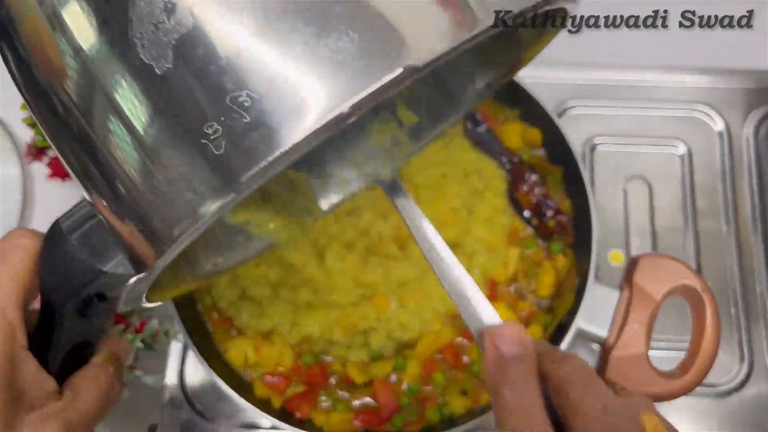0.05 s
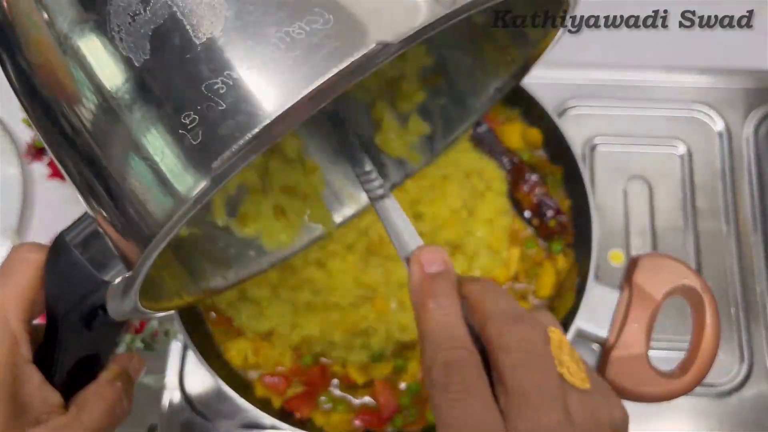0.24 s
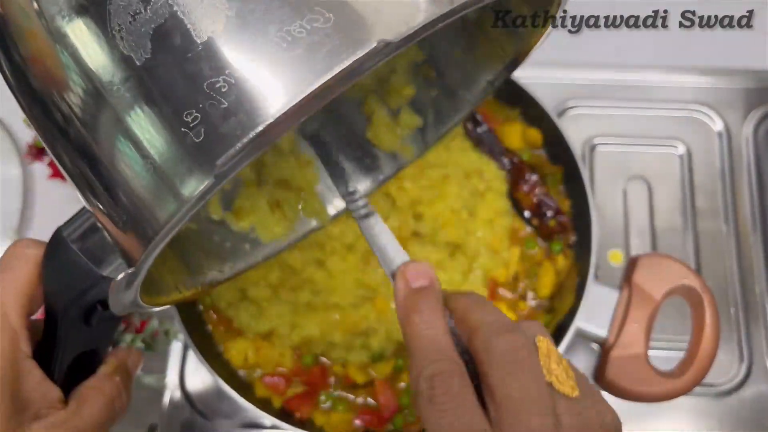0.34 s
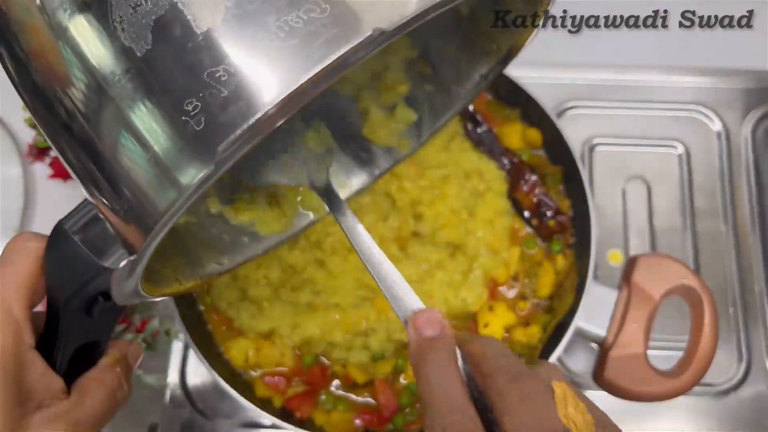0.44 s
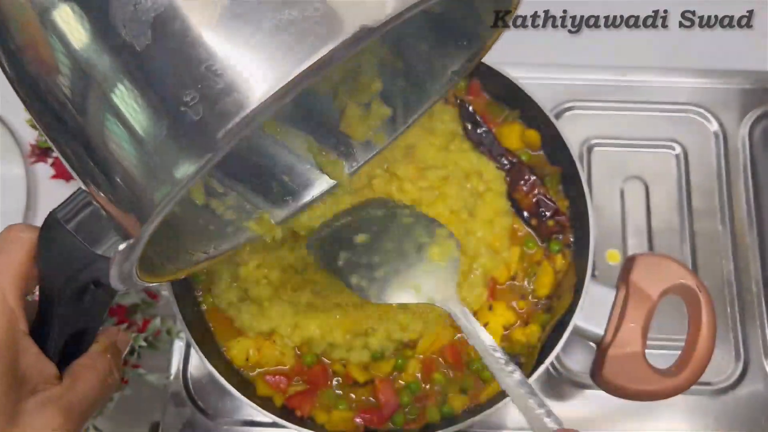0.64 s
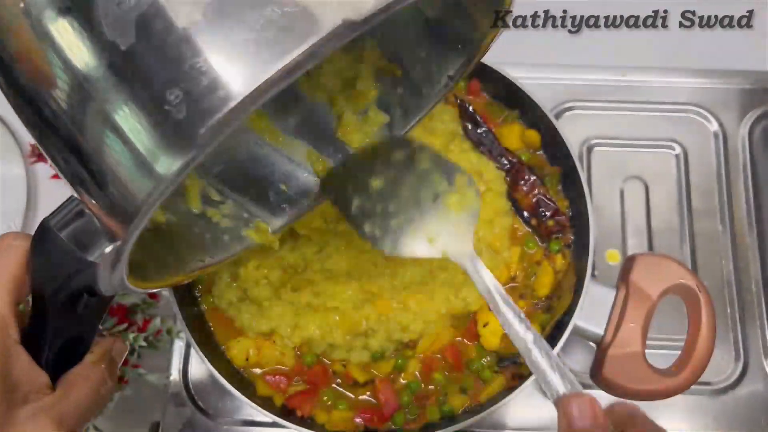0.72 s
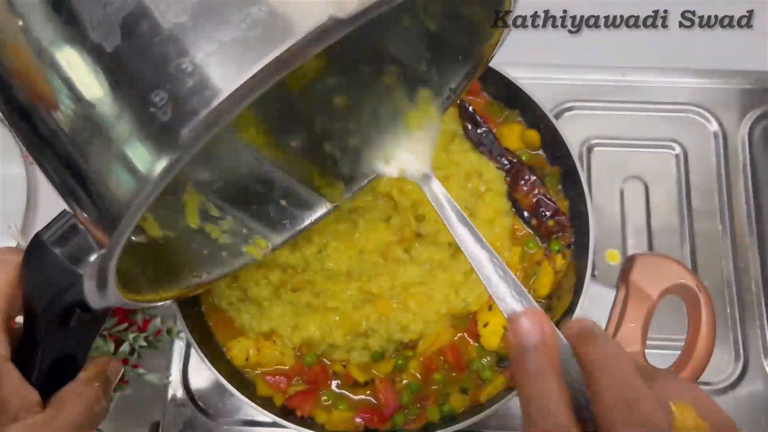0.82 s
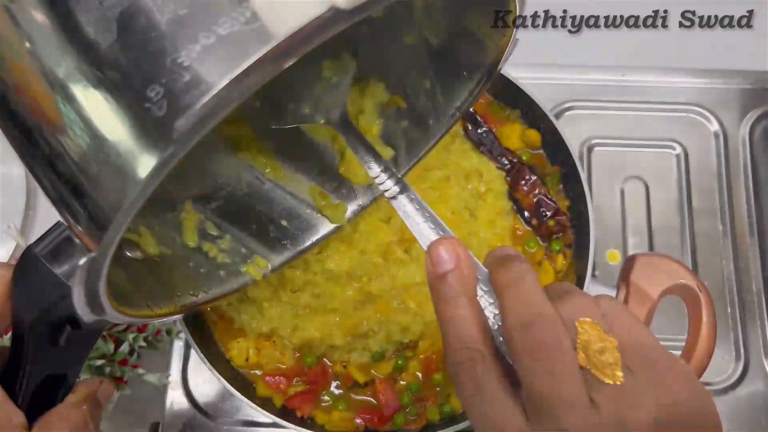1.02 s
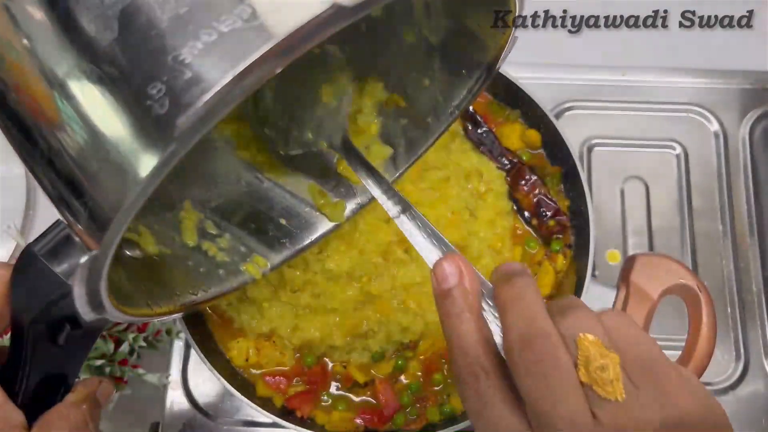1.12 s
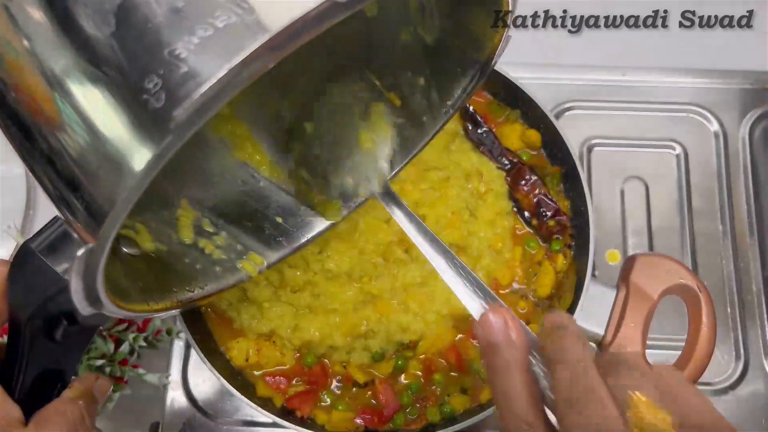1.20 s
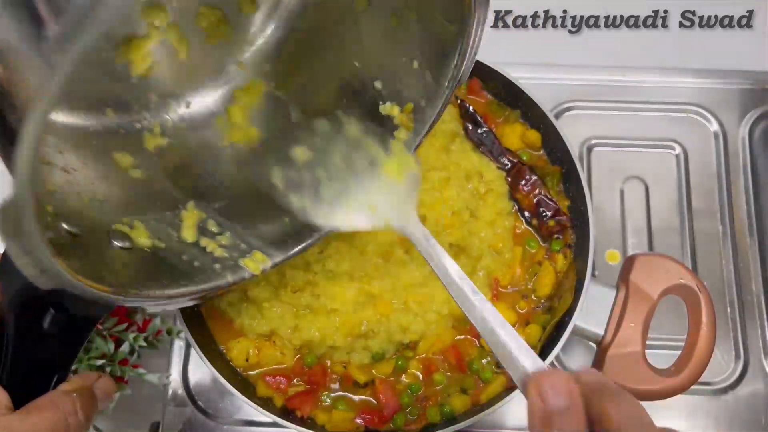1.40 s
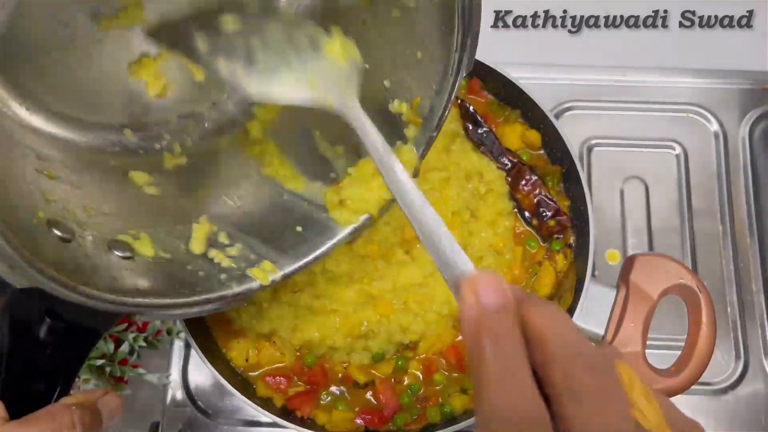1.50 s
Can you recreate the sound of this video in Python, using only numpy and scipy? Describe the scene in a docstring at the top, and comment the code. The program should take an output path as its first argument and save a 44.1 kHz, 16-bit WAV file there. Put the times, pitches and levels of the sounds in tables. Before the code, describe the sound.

Metal ladle clanking and scraping in a thin steel pot, with faint wet food ticks.

```python
"""Ladle in a steel pot

A small kitchen with a low hum; one microphone, close to a tilted stainless pot.
A steel ladle knocks inside it and twice scrapes along the wall, pushing out thick food that ticks wetly.
Each knock cracks through the thin shell and rings pot and ladle; each scrape is a stream of tiny
catches in the same metal."""
import sys
import numpy as np
from scipy import signal
from scipy.fft import rfft, irfft
from scipy.io import wavfile

SR = 44100
rng = np.random.default_rng(int(sys.argv[2]) if len(sys.argv) > 2 else 0)


def generate_wav(sig):
    """Save sig (samples, or channels by samples) to the path in sys.argv[1] as 16-bit PCM at SR."""
    pcm = np.round(np.clip(np.atleast_2d(sig).T, -1, 1) * 32767).astype(np.int16)
    wavfile.write(sys.argv[1], SR, pcm)


N = 68355
T = np.arange(N) / SR
TOP_HZ = 15800


def undb(db):
    """Decibels to amplitude."""
    return 10 ** (np.asarray(db) / 20)


def unit(x):
    """Scale to rms 1."""
    return x / np.sqrt(np.mean(x ** 2) + 1e-18)


def fade(t60):
    """Exponential decay, 60 dB down after t60 seconds."""
    return np.exp(-np.log(1000) * T / max(t60, 1e-3))


def swell(t60, rise_s):
    """Envelope of a ring that builds up before it fades; peak 1."""
    shape = fade(t60) * (1 - np.exp(-T / max(rise_s, 1e-4))) ** 2
    return shape / shape.max()


def delay(x, s):
    """Start a sound s seconds later."""
    return np.concatenate([np.zeros(int(s * SR)), x])[:N]


def through(x, response):
    """Play x through a response of unit energy."""
    return signal.fftconvolve(x, unit(response))[:N] / np.sqrt(N)


def colour(x, points):
    """Shape by a spectrum of (f/Hz, level/dB) points, rolling off below the first; rms 1."""
    hz, db = np.array(points).T
    f = np.maximum(np.arange(N // 2 + 1) * SR / N, 1)
    gain = undb(np.interp(np.log(f), np.log(hz), db))
    low_cut = np.minimum(f / hz[0], 1) ** 2
    return unit(irfft(rfft(x) * gain * low_cut, N))


def band(x, lo_hz, hi_hz):
    """Band-pass; rms 1."""
    sos = signal.butter(3, [lo_hz, min(hi_hz, SR / 2 - 1000)], "band", fs=SR, output="sos")
    return unit(signal.sosfilt(sos, x))


def sine(hz):
    """A partial at a random phase."""
    return np.sin(2 * np.pi * (hz * T + rng.random()))


def wavering(hz, depth, spread_hz):
    """A partial made unsteady by a narrow band of noise around it."""
    return sine(hz) + depth * band(rng.standard_normal(N), hz - spread_hz, hz + spread_hz)


def impacts(per_s, spread_db):
    """Random tiny impacts of uneven size; rms 1."""
    size = undb(spread_db * np.minimum(rng.exponential(size=N), 4))
    struck = rng.random(N) < per_s / SR
    return unit(struck * size * rng.choice([-1, 1], N))


def kitchen():
    """Room tone: steady noise with a low, wavering hum."""
    # spectrum of the room tone: f/Hz, relative density/dB
    room_spectrum = [(30, -41), (50, -7), (90, -2.5), (150, -4.5), (210, -17.5), (295, -4.5), (350, -12),
                     (500, -6.5), (700, -17), (1000, -19.5), (1400, -17), (5000, -26.5), (15500, -30.5)]
    # partials of the hum: f/Hz, level/dB
    hum_partials = [(78, -59), (121, -58.5)]
    hum = sum(undb(db) * unit(wavering(hz, depth=0.55, spread_hz=10)) for hz, db in hum_partials)
    return hum + undb(-53.5) * colour(rng.standard_normal(N), room_spectrum)


def food():
    """Sticky food slides, parts and lands: a soft rustle and a few clear ticks over a faint patter."""
    # the louder wet ticks: t/s, level/dB
    wet_ticks = [(.771, -48), (.8545, -47), (0.8983, -43.5), (0.929, -43.5), (1.397, -44.5), (1.414, -48),
                 (1.49, -62.5), (1.543, -46)]
    # spectrum of ticks and patter: f/Hz, relative density/dB
    wet_spectrum = [(600, -4), (2000, -6.5), (5000, -6), (10000, -5.5), (16000, -14)]
    # rustle of the food sliding out: t/s, level/dB
    slide_levels = [(.68, -60.5), (.82, -56.5), (.95, -58.5), (1.08, -61.5)]
    tick_t60 = 0.025
    ticks = sum(delay(undb(db) * colour(rng.standard_normal(N), wet_spectrum) * fade(tick_t60), s)
                for s, db in wet_ticks)
    patter = through(impacts(per_s=90, spread_db=3), rng.standard_normal(N) * fade(tick_t60 / 2))
    slide_gain = undb(np.interp(T, *np.array(slide_levels).T))
    slide = slide_gain * band(rng.standard_normal(N), lo_hz=666, hi_hz=1050)
    return ticks + slide + undb(-61) * colour(patter, wet_spectrum)


def shell(mode_bins):
    """The crowded modes of the thin steel, undamped, with fresh weights for each point of contact."""
    lines = np.zeros(N // 2 + 1, complex)
    lines[mode_bins] = rng.standard_normal(len(mode_bins)) + 1j * rng.standard_normal(len(mode_bins))
    return irfft(lines, N)


def rubbed_mode(drive, hz, t60):
    """A mode of the wall stores the energy of the rubbing and rings on, wavering a little."""
    retained = np.exp(-2 * np.log(1000) / (t60 * SR))
    energy = signal.lfilter([1 - retained], [1, -retained], drive ** 2)
    return np.sqrt(energy) * wavering(hz, depth=0.44, spread_hz=45)


def stroke(points):
    """Envelopes of hiss, grind and wall drive for one pass of the ladle; silent outside it."""
    times, *levels = np.array(points).T
    return undb([np.interp(T, times, db, left=-np.inf, right=-np.inf) for db in levels])


def scrapes(mode_bins):
    """The ladle's edge keeps catching: it hisses when light, grinds and rings the wall when pressed."""
    # two strokes along the wall, each: t/s, relative levels of hiss/dB, grind/dB, wall drive/dB
    strokes = [
        [(.27, -66, -56, -70), (.32, -75, -54, -76), (.43, -42, -40.5, -56), (.446, -33.5, -43, -47),
         (.50, -33.5, -42.5, -56), (.55, -36, -36, -65), (.59, -37, -37.5, -53.5), (.61, -34.5, -32.5, -32.5),
         (.63, -79, -55, -60), (.67, -73, -59, -64)],
        [(1.15, -43, -33, -66), (1.19, -34.5, -40.5, -69), (1.225, -34, -41.5, -58), (1.238, -28.5, -31, -42.5),
         (1.27, -33, -61, -47.5), (1.28, -47, -35.5, -43.5), (1.31, -58, -54, -57), (1.335, -67, -53, -69),
         (1.41, -78, -55.5, -62)],
    ]
    # spectrum of light contact: f/Hz, relative density/dB
    hiss_spectrum = [(1500, -12), (4000, -24), (7000, 0), (12000, 0.5), (16000, -2.5)]
    # spectrum of pressed contact: f/Hz, relative density/dB
    grind_spectrum = [(150, -34), (500, 0.5), (1100, -3), (2000, 5.5), (2800, -3.5), (4300, 7.5),
                      (7000, -5.5), (10000, -2.5), (16000, -35)]
    # modes of the wall: f/Hz, weight in the first stroke/dB, in the second/dB, t60/s
    wall_modes = [(1560, -9, -8, .25), (1852, -5, -24, .45), (1949, -11, -16, .3), (2030, -18, -6, .4),
                  (2143, -7, -16, .2), (3095, -9, -7, .3), (3755, -8, -18, .35), (3810, -7, -4, .3),
                  (4367, -11, -16, .25), (4715, -16, -6, .16), (5270, -11, -18, .2), (5385, -20, -5, .16),
                  (5440, -9, -12, .2), (5795, -22, -4, .15), (6410, -13, -6, .24), (9189, -9, -14, .13),
                  (9707, -18, -4, .14)]
    first, second = map(stroke, strokes)
    hiss_gain, grind_gain, _ = first + second
    hiss = hiss_gain * colour(impacts(per_s=5000, spread_db=4), hiss_spectrum)
    grind = grind_gain * colour(impacts(per_s=5000, spread_db=4), grind_spectrum)
    edge = hiss + grind
    shimmer = through(edge, shell(mode_bins) * fade(t60=0.12))
    wall = sum(rubbed_mode(undb(db1) * first[-1] + undb(db2) * second[-1], hz, t60)
               for hz, db1, db2, t60 in wall_modes)
    return undb(-6.5) * (edge + shimmer) + undb(2) * wall


def base_ring():
    """The struck base of the pot: its modes swell, beat and fade."""
    # modes of the base: f/Hz, relative level/dB, t60/s, rise/s
    base_modes = [(717, -26.5, .2, 0.0023), (1105, -17.5, 0.19, 0.00083), (1453, -7.5, 0.092, 0.00088),
                  (1543, -8.5, 0.35, 0.00095), (1620, -15.5, 0.46, 0.00035), (2190, -10.5, 0.076, 0.00086),
                  (2500, -11.5, 0.041, 0.0004), (2615, -8, 0.054, 0.00057), (3070, -9, 0.3, 0.0017),
                  (3100, -1.5, 0.071, 0.039), (4950, -17, 0.19, 0.0019), (6560, -22.5, 0.17, 0.0013),
                  (7430, -12, 0.049, 0.0007), (7720, -17, 0.11, .001), (8635, -16.5, 0.079, 0.00073),
                  (9420, -19, .13, 0.00085), (10240, -24, 0.26, .001)]
    return sum(undb(db) * np.sin(2 * np.pi * hz * T) * swell(t60, rise_s)
               for hz, db, t60, rise_s in base_modes)


def base_flex(hz=1567, length_s=0.011):
    """The base gives under the ladle and springs back: a brief tone with its octave."""
    phase = 2 * np.pi * hz * T
    arch = np.sin(np.pi * np.minimum(T / length_s, 1))
    return (np.sin(phase) + undb(-7.5) * np.sin(2 * phase)) * arch


def ladle_ring():
    """The struck ladle rings in quickly fading partials."""
    # modes of the ladle: f/Hz, relative level/dB, t60/s before scaling
    ladle_modes = [(520, -7, .12), (607, -8, .08), (3066, -5, .17), (3571, -8, .12), (4932, 0, .17),
                   (5140, -5, .19), (5485, -1, .09), (5947, 1, .1), (6888, -9, .11), (7280, -7, .14),
                   (8668, -7, .15), (11043, -6, .14)]
    ring_scale = 0.77  # shortens all the ladle's ring times
    return sum(undb(db) * sine(hz) * fade(t60 * ring_scale) for hz, db, t60 in ladle_modes)


def knocks(mode_bins):
    """Ladle strikes pot: a short crack, a shimmer of the shell, and the rings of base and ladle."""
    # strikes: t/s, thud/dB, clang/dB, ping/dB, fizz/dB, crack t60/s, base/dB, ladle/dB, flex/dB
    strikes = [(.2430, -29, -39.5, -21.5, -21, 0.054, -46, -25.5, -53),
               (0.3464, -21.5, -18, -20, -21.5, 0.047, -28.5, -39, -9.5),
               (0.3537, -33, -28, -22.5, -36, 0.056, -33, -54, -30),
               (0.3632, -46, -24, -34, -31, 0.039, -18, -52, -33),
               (0.5531, -38.5, -32.5, -31, -36.5, 0.068, -39.5, -43, -36),
               (.6670, -52, -48, -36.5, -35, 0.027, -70, -76, -70),
               (1.1154, -33, -25.5, -20, -22, 0.085, -17, -33, -19),
               (1.119, -48, -16, -43, -26, 0.018, -62, -42, -31.5),
               (1.2739, -69, -37.5, -26.5, -32.5, 0.11, -71, -45, -55)]
    # bands of the crack (thud, clang, ping, fizz): low f/Hz, high f/Hz
    crack_bands = [(245, 1096), (1900, 3490), (6000, 9800), (10000, 15100)]
    shimmer_dbs = (-16, -16, -24.5, -24.5)  # against the crack, band by band
    shimmer_t60, attack_s = 0.18, 0.000095
    attack = 1 - np.exp(-T / attack_s)
    base, flex = base_ring(), base_flex()
    out = np.zeros(N)
    for s, *band_dbs, crack_t60, base_db, ladle_db, flex_db in strikes:
        noise, steel = rng.standard_normal(N), shell(mode_bins)
        hit = undb(base_db) * base + undb(flex_db) * flex + undb(ladle_db) * ladle_ring()
        for (lo, hi), db, shimmer_db in zip(crack_bands, band_dbs, shimmer_dbs):
            crack = band(noise, lo, hi) * fade(crack_t60)
            shimmer = undb(shimmer_db) * band(steel, lo, hi) * fade(shimmer_t60)
            hit += undb(db) * (crack + shimmer)
        out += delay(hit * attack, s)
    return out


def scene():
    """Pot, ladle and food close to the microphone, the kitchen's short echo behind them; mono."""
    mode_bins = rng.integers(1, int(TOP_HZ * N / SR), size=260)  # the shell's modes as FFT bins
    near = knocks(mode_bins) + scrapes(mode_bins) + food()
    room_response = delay(rng.standard_normal(N) * fade(t60=0.35), s=0.006)
    echo = undb(-11.5) * through(near, room_response)
    return (near + echo + kitchen())[None]


def record(dry):
    """The recorder cuts the treble steeply above TOP_HZ."""
    return signal.sosfilt(signal.ellip(10, .2, 70, TOP_HZ, fs=SR, output="sos"), dry)


dry = scene()
out = record(dry)
generate_wav(out)
```